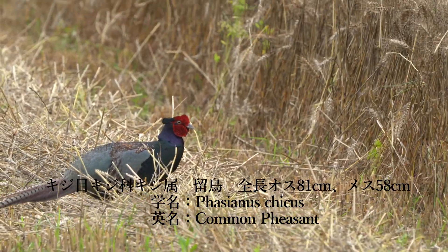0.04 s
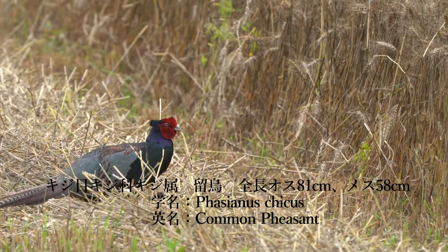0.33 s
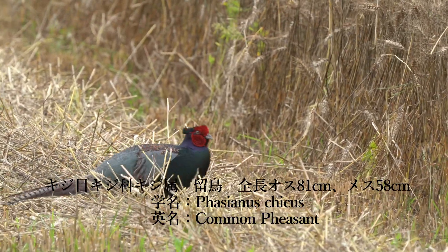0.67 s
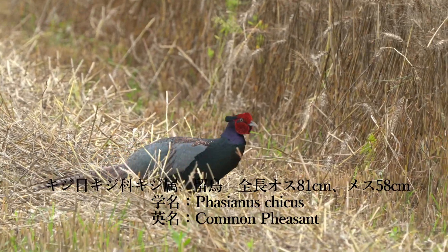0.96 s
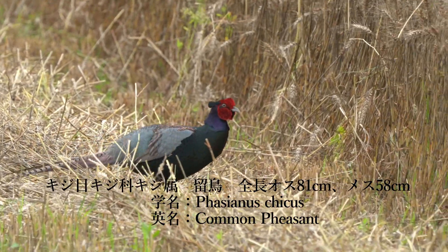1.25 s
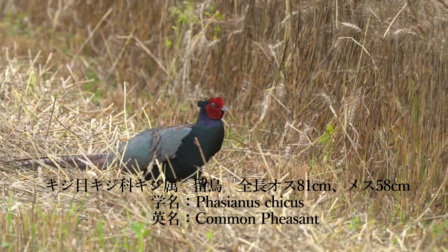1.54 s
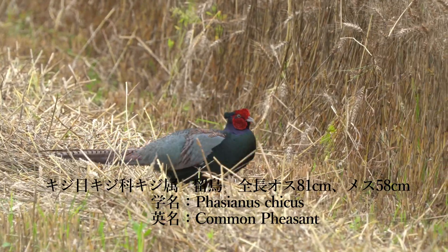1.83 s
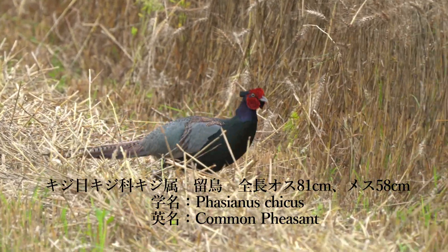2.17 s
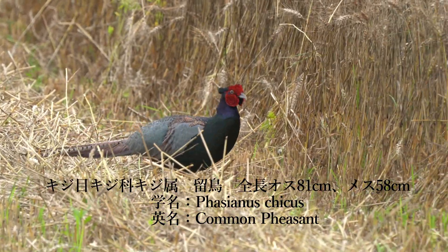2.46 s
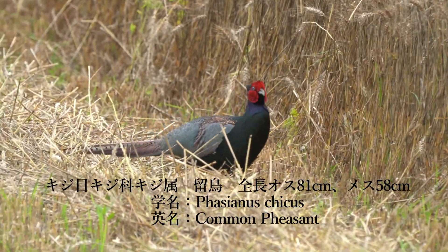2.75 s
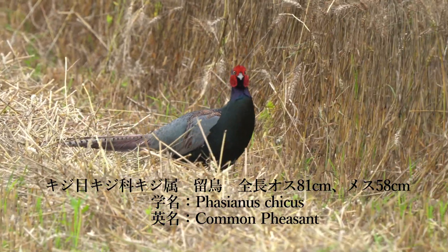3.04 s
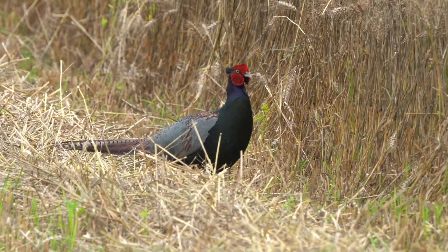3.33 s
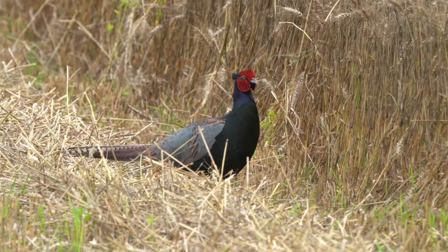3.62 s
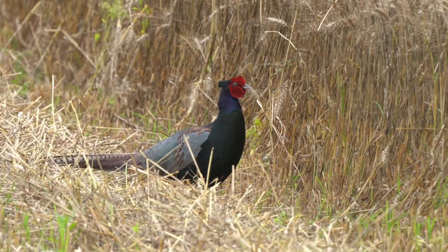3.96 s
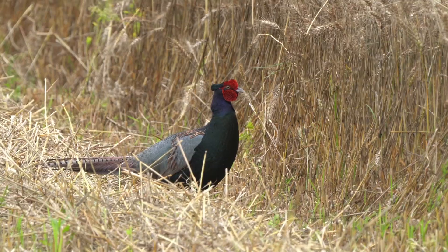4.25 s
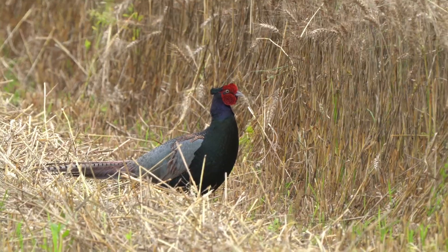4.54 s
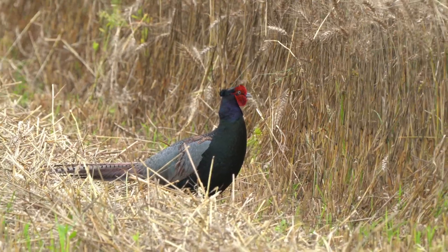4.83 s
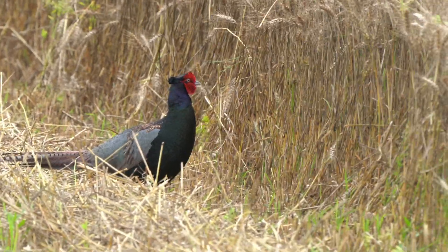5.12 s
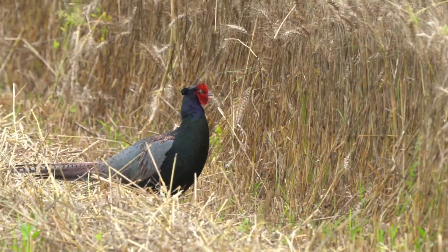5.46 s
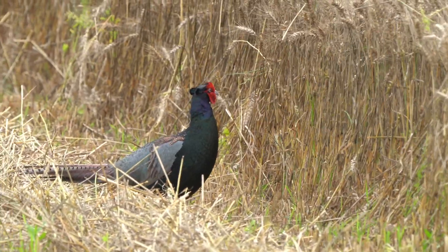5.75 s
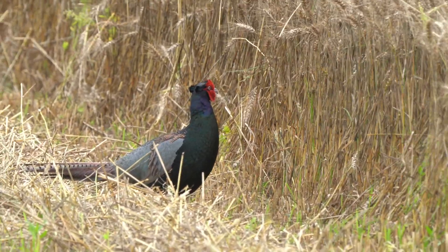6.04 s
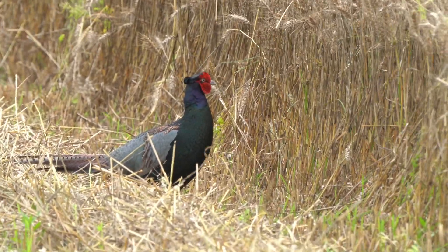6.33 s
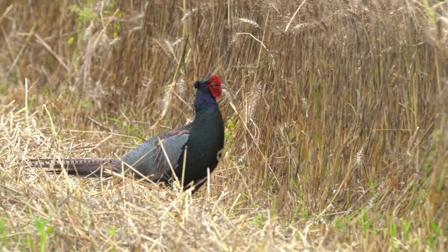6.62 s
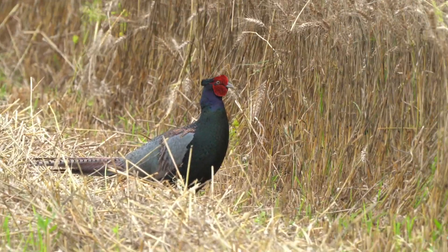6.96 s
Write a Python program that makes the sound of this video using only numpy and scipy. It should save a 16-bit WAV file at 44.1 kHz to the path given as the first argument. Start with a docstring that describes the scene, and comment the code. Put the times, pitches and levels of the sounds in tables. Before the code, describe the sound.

Short rattling frog calls repeat in an open field, among thin bird whistles, sharp chips and distant twittering over steady hiss.

```python
"""A wheat field opens on a steady far wash, a low hum and hiss, with thin whistles and far twittering.
From 1 s a tree frog rattles about three times a second, each pulse ringing its throat, while birds
chip and buzz. A second frog answers at 3.3 s, and soon the farthest chatter grows louder. At 4.5 s a
foot cracks dry straw and thuds softly. The tree frog peaks near 5 s, is answered again at 6 s, and
fades under the last whistles."""
import sys
import numpy as np
from scipy import signal
from scipy.fft import rfft, irfft, next_fast_len
from scipy.io import wavfile
from scipy.ndimage import uniform_filter1d

SR = 44100
rng = np.random.default_rng(int(sys.argv[2]) if len(sys.argv) > 2 else 0)


def digitize_waveform(pressure):
    """Quantize a signal to 16-bit integers and store it at the path in sys.argv[1].

    Rows of a 2-D input are taken as channels; values are limited to [-1, 1].
    """
    field = np.atleast_2d(pressure).T
    bounded = np.clip(field, -1, 1)
    quanta = np.round(bounded * 32767).astype(np.int16)
    wavfile.write(sys.argv[1], SR, quanta)


N = 312669

# each frog's calls: t/s, duration/s, nominal level/dB
TREE_FROG_CALLS = [(.988, .061, -26.5), (1.3745, .061, -27.5), (2.309, .037, -31), (2.5345, .037, -28),
                   (2.750, .049, -30), (3.0465, .061, -27), (3.390, .073, -28.5), (3.7275, .073, -29),
                   (4.129, .061, -23.5), (4.476, .073, -25), (4.833, .085, -20), (5.169, .073, -19),
                   (5.544, .073, -21.5), (5.8815, .085, -23.5), (6.253, .037, -25.5), (6.625, .037, -28.5),
                   (7.037, .037, -31.5)]
SECOND_FROG_CALLS = [(3.2505, .049, -24.5), (6.0245, .049, -25.5)]
# throat modes: nominal f/Hz, relative level/dB, lag/s, nominal duration/s, glide/(Hz/s),
# share of the calls' level changes that the mode follows
TREE_FROG_MODES = [(2912, 0, 0, .008, -12000, 1), (1420, -15, -.001, .0095, 70000, .25),
                   (3500, -16, 0, .007, 0, .8)]
SECOND_FROG_MODES = [(2700, 0, 0, .0055, -40000, 1), (1080, -13.5, -.003, .011, 25000, 1),
                     (3150, -6, -.001, .005, 0, 1), (3680, -7.5, .002, .009, 20000, 1)]
def frogs():
    """Source and resonator: two frogs pulse at the same rate, but their throats ring differently."""
    tree_frog = rattle(TREE_FROG_CALLS, TREE_FROG_MODES, taper=.47, jitter_rad=1.0)
    tree_frog = reverberate(tree_frog, t60=.35, echo_db=-9)
    second_frog = rattle(SECOND_FROG_CALLS, SECOND_FROG_MODES, taper=.3, jitter_rad=1.4)
    return tree_frog + reverberate(second_frog, t60=.076, echo_db=-8)


def rattle(calls, modes, taper, jitter_rad, pulses_per_s=82.2, reference_db=-22, sag_hz_per_s=700):
    """Pulsed resonance: each pulse rings the throat and vocal sac, a little lower as air runs out."""
    out, t = np.zeros(N), np.arange(-SR // 100, SR // 100) / SR
    for s, length, db in calls:
        count = round(length * pulses_per_s) + 1
        detune_hz = 15 * rng.standard_normal()
        for k, place in enumerate(np.linspace(-1, 1, count)):
            pulse, since = np.zeros(len(t)), k / pulses_per_s
            tension = 1.018 - .011 * place + .01 * rng.standard_normal()
            for hz, mode_db, lag, ring, glide, follows in modes:
                u = t - lag
                cycles = (hz + detune_hz) * since + hz * tension * u + glide * u ** 2 / 2
                cycles -= sag_hz_per_s * (since + u - length / 2) ** 2 / 2
                level_db = reference_db + follows * (db - reference_db) + mode_db
                level_db += .5 * rng.standard_normal()
                envelope = arch(u * np.where(u < 0, 1.35, .9), ring)  # quick rise, slower fall
                phase = 2 * np.pi * cycles + jitter_rad * rng.standard_normal()
                pulse += gain_of(level_db) * envelope * np.sin(phase)
            swell = np.exp(-taper * (place - .1) ** 2)
            add(out, s + since + t[0], swell * pulse)
    return out


# sharp chips: t/s, nominal snap level/dB, slur level/dB
CHIP_CALLS = [(1.196, -39, -35), (1.8785, -35, -30), (2.041, -31, -48), (2.098, -30.5, -46),
              (2.3203, -33.5, -35), (2.882, -32, -33), (3.1566, -25, -31), (3.352, -29.5, -30.5),
              (3.6952, -32.5, -29), (3.914, -33, -33), (4.167, -35, -31), (4.4118, -45, -30),
              (4.7316, -27.5, -27), (5.2246, -22, -21), (5.439, -32.5, -31), (5.8351, -39, -34),
              (6.302, -40, -47), (6.517, -36, -31.5)]
def chips(soft_count=6, soft_from_s=.97, soft_to_s=2.8):
    """Frequency sweep: a bird's chip plunges about an octave, a high snap and then a lower slur."""
    out = np.zeros(N)
    places = (np.arange(soft_count) + rng.random(soft_count)) / soft_count
    soft_chips = [(s, -40.5, -47) for s in soft_from_s + (soft_to_s - soft_from_s) * places]
    for s, snap_db, slur_db in list(CHIP_CALLS) + soft_chips:
        fade_db = .98 * (snap_db + 25)  # softer snaps give out earlier
        snap = gain_of(snap_db + 2) * plunge(.0048, top_hz=7740, end_hz=4980, bend=1.7, tilt_db=fade_db)
        slur = gain_of(slur_db) * plunge(.0111, top_hz=4634, end_hz=3600, bend=1.43, tilt_db=-3)
        add(out, s - .0015, np.concatenate([snap, slur]))
    return out


def plunge(length, top_hz, end_hz, bend, tilt_db):
    """Nonlinear chirp: a tiny whistle falls ever faster while its level tilts from start to end."""
    u = np.linspace(0, 1, round(length * SR), endpoint=False)
    hz = (top_hz + (end_hz - top_hz) * u ** bend) * (1 + .016 * rng.standard_normal())
    envelope = np.sqrt(np.sin(np.pi * u)) * gain_of(tilt_db * (u - .5))
    return envelope * np.sin(2 * np.pi * np.cumsum(hz) / SR)


# thin whistles: centre t/s, duration/s, f/Hz, glide/(Hz/s), level/dB
WHISTLE_NOTES = [(0.166, .065, 5090, 300, -27.5), (0.467, .15, 5000, 1400, -37),
                 (.583, .07, 4640, 500, -35), (0.769, .09, 5010, 700, -27.5),
                 (0.836, .075, 4930, -500, -37), (1.068, .095, 4980, 900, -26.5),
                 (1.371, .071, 4980, 900, -23.5), (1.93, .28, 1857, 7, -46.5),
                 (4.729, .036, 4080, -21000, -27), (4.801, .04, 3730, 2197, -31),
                 (4.967, .03, 4215, -12000, -32), (6.495, 0.12, 4850, -400, -38),
                 (6.586, .064, 4490, -1300, -20.5), (6.883, .061, 4450, -2600, -30)]
def whistles(waver=.0048, flutter=.25, echo_s=.036, echo_db=-15.5):
    """Reflection: the edge of the crop throws each gliding, trembling bird note back once."""
    out = np.zeros(N)
    for s, length, pitch_hz, glide, db in WHISTLE_NOTES:
        t = centred_time(length)
        hz = (pitch_hz + glide * t) * (1 + waver * noise_band(0, 78, len(t)))
        swell = arch(t, length) ** .53 * (1 + flutter * noise_band(0, 110, len(t)))
        note = gain_of(db) * swell * np.sin(2 * np.pi * np.cumsum(hz) / SR)
        add(out, s + t[0], note)
        add(out, s + t[0] + echo_s, gain_of(echo_db) * note)
    return out


# straws cracking: t/s, level/dB
STRAW_CRACKS = [(4.4601, -26), (4.498, -30.5)]
# spectrum of a crack: f/Hz, relative level/dB
STRAW_SPECTRUM = [(900, -17), (2500, -5), (3700, 12), (4800, -4), (6300, 1.5), (9000, -18), (15000, -22)]
# thuds on the ground: t/s, nominal level/dB, decay time/s
GROUND_THUDS = [(4.452, -41, 0.1), (4.702, -45, .04)]
def footstep(crack_s=.013, thud_hz=35, rumble_width_hz=22, rise_s=.012):
    """Fracture and damped vibration: straws crack in noise bursts, and the weight lands with a thud."""
    out, t = np.zeros(N), centred_time(crack_s)
    for s, db in STRAW_CRACKS:
        add(out, s + t[0], gain_of(db) * arch(t, crack_s) * coloured_noise(STRAW_SPECTRUM, len(t)))
    t = np.arange(SR // 2) / SR
    for s, db, decay in GROUND_THUDS:
        ground = np.sin(2 * np.pi * thud_hz * t) + .5 * noise_band(thud_hz, rumble_width_hz, len(t))
        envelope = (1 - np.exp(-t / rise_s)) * np.exp(-t / decay)
        add(out, s, gain_of(db) * envelope * ground)
    return out


# far songbirds' buzzes: centre t/s, duration/s, f/Hz, nominal level/dB
BUZZ_NOTES = [(1.19, 0.21, 5200, -43), (2.342, .13, 4710, -38.5), (3.01, 0.3, 4650, -42.5),
              (3.61, 0.15, 4620, -41.5), (4.13, .14, 3820, -37.5), (4.774, .13, 4750, -40),
              (5.293, .23, 4800, -41), (5.88, .19, 3820, -37.5), (6.04, 0.22, 5550, -47.5),
              (6.311, 0.062, 4560, -43)]
def buzzes(trill_hz=54, depth_hz=85, blur_hz=80):
    """Frequency modulation: a fast trill on the pitch makes a long, blurred note buzz."""
    out = np.zeros(N)
    for s, length, hz, db in BUZZ_NOTES:
        t = centred_time(length)
        trill = np.sin(2 * np.pi * (trill_hz * rng.uniform(.96, 1.04) * t + rng.random()))
        note = swept_band(hz, blur_hz, phase=2 * np.pi * np.cumsum(depth_hz * trill) / SR)
        add(out, s + t[0], gain_of(db - 1) * np.sqrt(arch(t, length)) * note)
    return out


# a far bird's phrases: first pair t/s, last pair t/s, level/dB
TWITTER_PHRASES = [(0.285, 1.604, -48), (2.497, 3.894, -47)]
def twitter(pair_s=.227, note_s=.085, high_hz=6640, low_hz=6050, spread_hz=300, fall_hz_per_s=6000):
    """Scattering: the crop smears the pitch of falling notes that see-saw between high and low."""
    out, t = np.zeros(N), centred_time(note_s)
    for first, last, db in TWITTER_PHRASES:
        for s in np.linspace(first, last, round((last - first) / pair_s) + 1):
            for lag_s, hz, note_db in [(0, high_hz, 0), (.054, low_hz, -.5)]:
                note = swept_band(hz, spread_hz, phase=-np.pi * fall_hz_per_s * t ** 2)
                stray_s, stray_db = rng.standard_normal(2) * [.008, 2]
                envelope = gain_of(db + note_db + stray_db) * arch(t, note_s)
                add(out, s + lag_s + stray_s + t[0], envelope * note)
    return out


# strength of the farthest birdsong: t/s, note level/dB
CHATTER_LEVELS = [(0, -56), (3.4, -59), (3.8, -50), (7.09, -49)]
def chatter(notes_per_s=26, low_hz=5400, high_hz=6400, width_hz=130, note_s=.066):
    """Random superposition: faint, blurred bird notes overlap, most of them low in their range."""
    out, t = np.zeros(N), centred_time(note_s)
    for when, height in rng.random((round(notes_per_s * N / SR), 2)):
        s = when * N / SR
        note = noise_band(low_hz + (high_hz - low_hz) * height ** 2, width_hz, len(t))
        db = np.interp(s, *np.transpose(CHATTER_LEVELS))
        add(out, s, gain_of(db) * arch(t, note_s) * note)
    return out


# spectrum of the far wash: f/Hz, relative level/dB
WASH_SPECTRUM = [(20, -3.5), (45, -7), (110, -10), (210, -12.5), (420, -11), (900, -12.5), (1200, -10.5),
                 (1650, -6), (2350, -6.5), (2700, -4.5), (3050, 0), (3900, 0.4), (4650, -1), (5200, -9.5),
                 (6800, -15.5), (8500, -20), (15500, -17)]
def wash(level_db=-36):
    """Incoherent sum: far frogs, birds and wheat merge into noise that shimmers where the voices lie."""
    hz, _, spectra = signal.stft(coloured_noise(WASH_SPECTRUM, N), SR, nperseg=512, noverlap=384)
    patches = uniform_filter1d(rng.standard_normal(spectra.shape), size=6, axis=0)  # across frequency
    patches = unit_rms(uniform_filter1d(patches, size=18, axis=1))  # across time
    swell = unit_rms(uniform_filter1d(rng.standard_normal(spectra.shape[1]), size=120))
    depth = curve_at([(700, .17), (1800, .73), (4500, .86), (8000, 1.23)], hz)[:, None]
    shimmer_db = depth * (1.88 * patches - .26 * swell)
    _, chorus = signal.istft(spectra * gain_of(shimmer_db), SR, nperseg=512, noverlap=384)
    return gain_of(level_db) * unit_rms(chorus[:N])


# steady tones: f/Hz, rms level/dB, width/Hz
HUM_TONES = [(77.3, -63.5, 7), (155.3, -62.5, 5.6), (282, -67.5, 6.3), (432, -67.5, 16), (1917, -58, 17),
             (13727, -71, 4)]
def hum():
    """Narrow-band noise wavers like an unsteady tone: a far engine's hum and two faint high whines."""
    return sum(gain_of(db) * noise_band(hz, width, N) for hz, db, width in HUM_TONES)


# spectrum of the hiss: f/Hz, relative level/dB
HISS_SPECTRUM = [(40, -8), (200, -10), (600, -5), (1300, -17.5), (2600, -7.5), (4500, -1.5), (8000, 1.5),
                 (10500, 1.5), (13000, 5), (15800, 4)]
def hiss(level_db=-42.5):
    """Self-noise: each of two microphones adds its own uncorrelated hiss."""
    return gain_of(level_db) * np.array([coloured_noise(HISS_SPECTRUM, N) for _ in range(2)])


def reverberate(x, t60, echo_db):
    """Diffuse scattering: countless stalks return a weak echo that falls 60 dB in t60 seconds."""
    t = np.arange(SR // 2) / SR
    taps = rng.standard_normal(len(t)) * gain_of(-60 * t / t60) * (t > .004)
    return x + gain_of(echo_db) * signal.fftconvolve(x, taps / np.linalg.norm(taps))[:N]


def coloured_noise(points, size):
    """Spectral shaping: white noise takes on the given spectrum, at rms 1."""
    shape = gain_of(curve_at(points, np.fft.rfftfreq(size, 1 / SR)))
    return unit_rms(irfft(rfft(rng.standard_normal(size)) * shape, size))


def noise_band(hz, width, size):
    """Band-pass filtering: noise in a bell-shaped band; around 0 Hz it is a random waver."""
    padded = next_fast_len(size + SR // 4)
    bell = np.exp(-((np.fft.rfftfreq(padded, 1 / SR) - hz) / width) ** 2)
    return unit_rms(irfft(rfft(rng.standard_normal(padded)) * bell, padded))[:size]


def swept_band(hz, width, phase):
    """Phase modulation: a changing phase, in radians, bends the pitch of a noise band."""
    analytic = signal.hilbert(noise_band(hz, width, len(phase)))
    return unit_rms((analytic * np.exp(1j * phase)).real)


def curve_at(points, hz):
    """Interpolation on a log-frequency axis."""
    f, value = np.transpose(points)
    return np.interp(np.log(hz + 1), np.log(f), value)


def centred_time(length):
    """Time axis in seconds, centred on zero."""
    return np.arange(-length / 2, length / 2, 1 / SR)


def arch(t, length):
    """Raised-cosine window centred on t = 0."""
    return np.cos(np.pi * np.clip(t / length, -.5, .5)) ** 2


def gain_of(db):
    """Decibels to amplitude."""
    return 10 ** (np.asarray(db) / 20)


def unit_rms(x):
    """Normalisation to rms 1."""
    return x / np.sqrt(np.mean(x ** 2) + 1e-20)


def add(mix, s, sound):
    """Superposition: a sound joins the mix at time s."""
    part = mix[max(round(s * SR), 0):][:len(sound)]
    part += sound[:len(part)]


def scene():
    """Linear superposition: everything outdoors reaches both channels alike; only the hiss differs."""
    near = frogs()
    near += reverberate(chips(), t60=.12, echo_db=-12.5)
    near += reverberate(whistles(), t60=.34, echo_db=-17)
    far_birds = twitter() + buzzes() + chatter()
    return near + far_birds + hiss() + footstep() + wash() + hum()


def record(dry, cutoff_hz=15800):
    """Band limiting: a steep low-pass filter removes the highest treble."""
    low_pass = signal.firwin(511, cutoff_hz, window=("kaiser", 9), fs=SR)
    return signal.oaconvolve(dry, low_pass[None], "same")


dry = scene()
out = record(dry)
digitize_waveform(out)
```